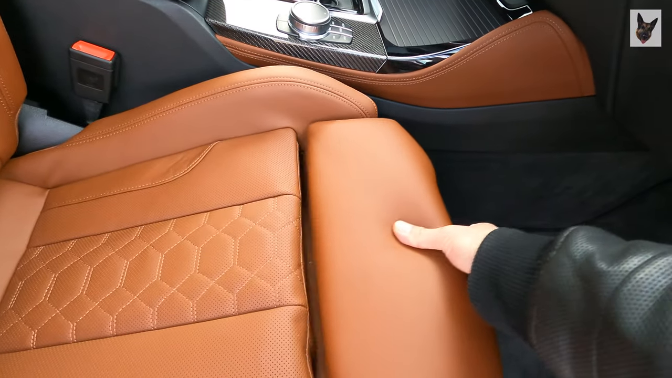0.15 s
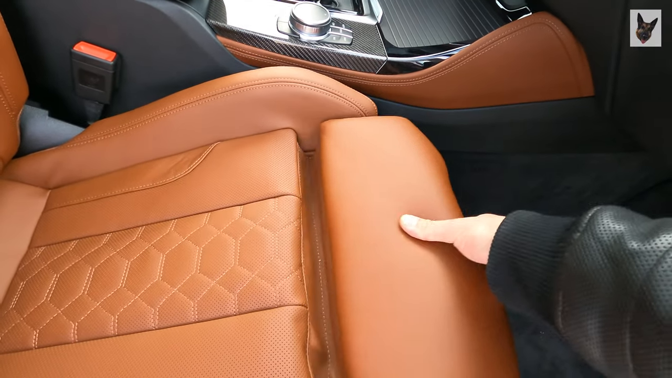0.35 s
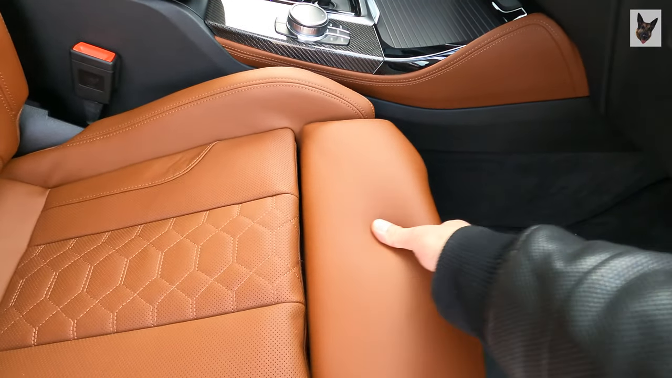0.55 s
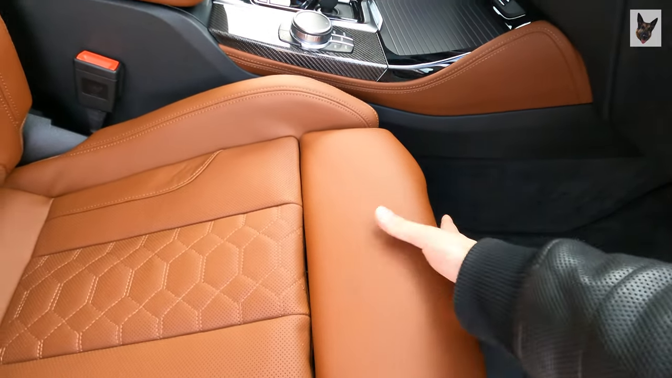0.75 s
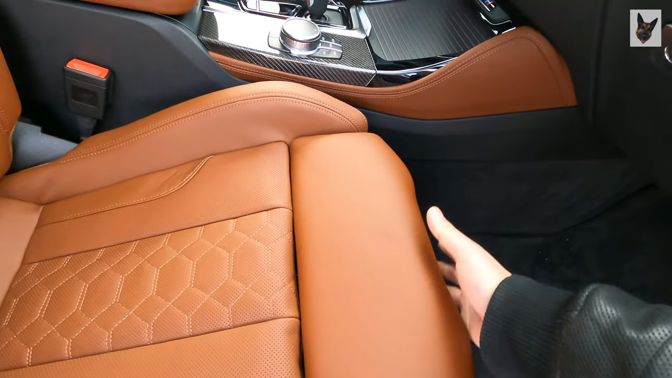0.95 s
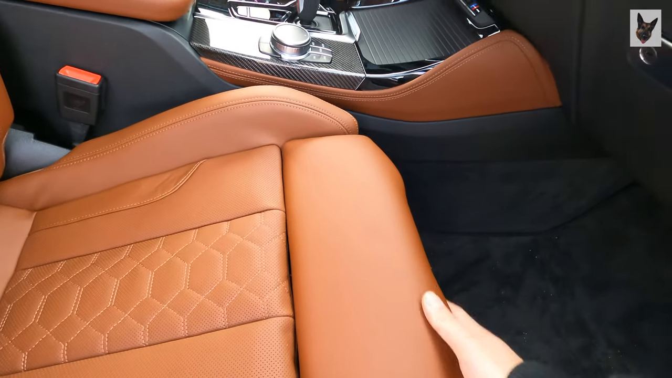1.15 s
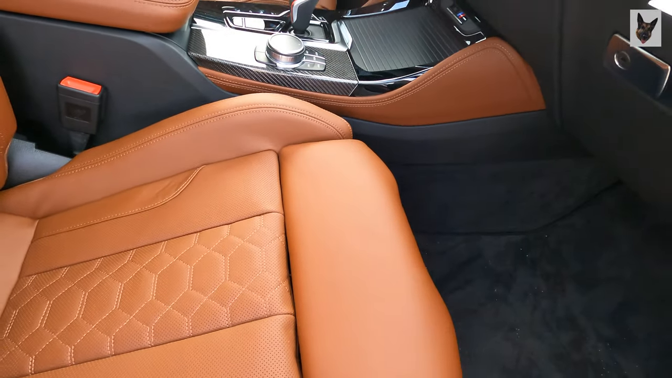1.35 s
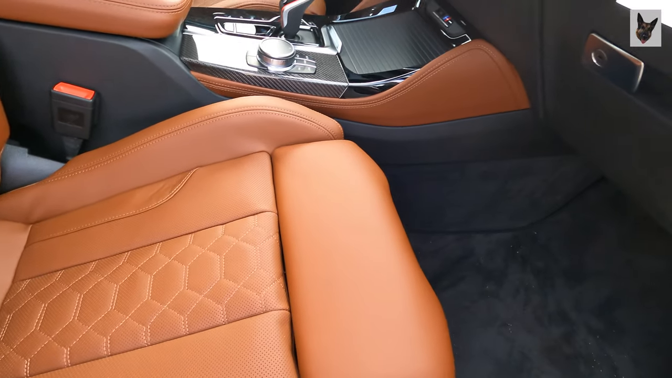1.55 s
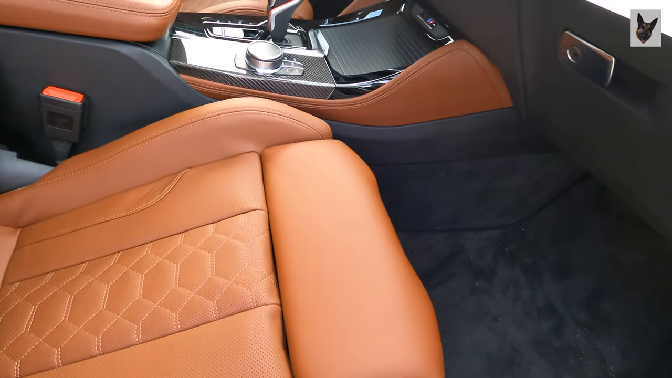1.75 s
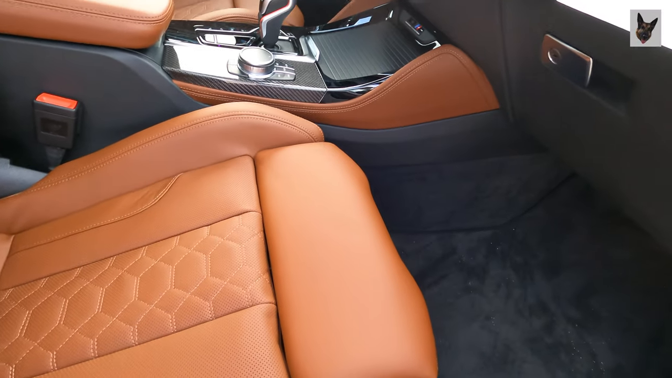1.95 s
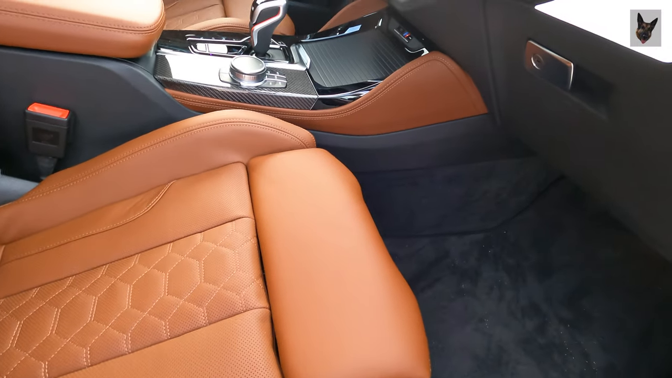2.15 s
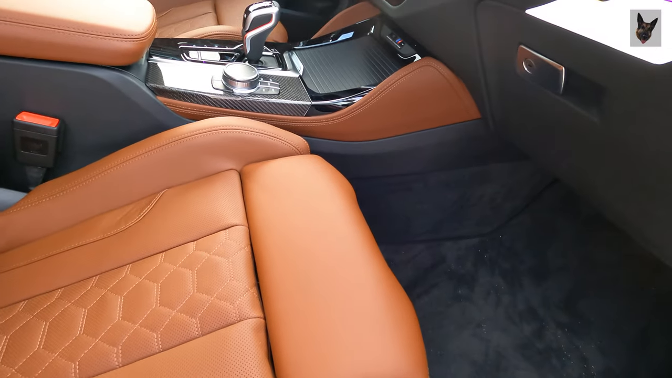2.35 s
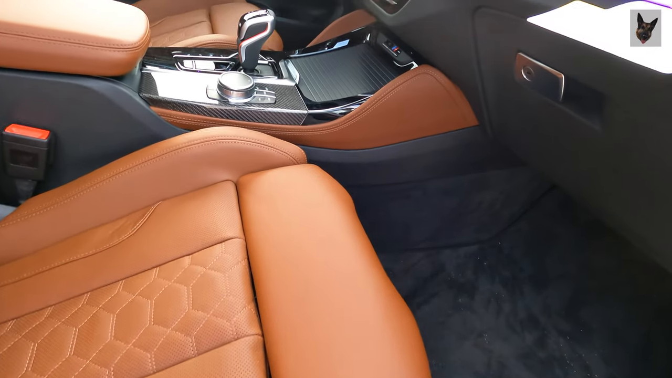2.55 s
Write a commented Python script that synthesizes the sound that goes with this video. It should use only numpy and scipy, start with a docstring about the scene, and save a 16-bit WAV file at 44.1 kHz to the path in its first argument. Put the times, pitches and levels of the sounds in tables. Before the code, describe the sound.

Sliding seat cushion knocks and thumps on its rails, then faint sleeve rustle in a quiet car

```python
"""In a car, close to a leather seat: a hand works the sliding thigh cushion out and back on its rails.
Friction grains make its strokes, struck modes and noise bursts the knocks of latch and stops, and low
decaying sines the thump and sway of the frame. Afterwards a sleeve rustles in more even grains and a few
small ticks ring. Noise in shaped bands rumbles as traffic outside. Stereo is built as mid and side."""
import sys
import numpy as np
from scipy import signal
from scipy.io import wavfile

SR = 44100
rng = np.random.default_rng(int(sys.argv[2]) if len(sys.argv) > 2 else 0)


def dump_mix(stems):
    """Bounce the given channels to the path in sys.argv[1] as a 16-bit WAV at rate SR."""
    frames = np.atleast_2d(stems).T  # one column per channel
    limited = np.clip(frames, -1, 1)  # hard clip at full scale
    pcm = np.round(limited * 32767).astype(np.int16)
    wavfile.write(sys.argv[1], SR, pcm)


N = 114660
NEAR_SIDE_DB = -13   # added to the side level close to the microphone: seat and sleeve friction is narrower

# Knocks of latch and stops: (time [s], first touch [dB] before the mode's own level, pitch struck most [Hz],
# spread [octaves], rattle length [s], crack [dB])
KNOCKS = [(0.198, -40, 800, .4, 0.0022, -65), (.2188, -34, 1000, 1.1, .0015, -43),
          (0.221, -32, 593, 0.82, 0.0073, -51), (0.236, -36, 600, 0.6, 0.0061, -66),
          (0.399, -41, 1200, 1.3, 0.0021, -53.5), (.4050, -33, 2500, .45, .005, -46),
          (.4095, -36, 950, .5, .003, -54), (.6208, -23.5, 1100, .7, .005, -42),
          (0.622, -27.5, 630, 0.34, 0.0052, -49.5), (.6735, -31, 700, .9, .004, -46),
          (0.778, -45.5, 1760, 2, 0.0029, -47.5), (.8168, -30, 3200, .9, .006, -37),
          (0.817, -22, 693, 0.3, 0.00404, -42.5), (0.826, -35.5, 525, 0.12, 0.01443, -70)]
# Ringing modes of the seat: (frequency [Hz], level [dB], decay by 60 dB [s])
SEAT_MODES = [(270.4, 11.5, 0.1), (360, -1, 0.095), (510, 6.5, 0.024), (685, -4, 0.051), (976, 0, 0.014),
              (1144, 1.5, 0.02), (1476, -3.5, 0.021), (2130, -6, 0.014), (2505, -2.5, 0.025),
              (3330, -5, 0.013), (3820, -8, 0.018), (5060, -9.5, 0.021)]
TOUCHES, TOUCH_LOSS_DB = 6, 2   # touches in one rattle, each weaker than the last
CONTACT_HZ = 5000   # softness of a touch
CRACK_T60_S = 0.07


def knocks():
    """Each knock rattles in quick touches on the modes around its pitch; returns ringing and crack envelope."""
    start, first_db, centre_hz, spread, length, crack_db = np.transpose(KNOCKS)[:, :, None]
    touch = np.arange(TOUCHES)
    lateness = rng.uniform(0, .7, (len(start), TOUCHES)) * (touch > 0)
    times = start + (touch + lateness) / TOUCHES * length
    at = (times * SR).astype(int)
    signs = rng.choice([-1, 1], at.shape)
    loss_db = TOUCH_LOSS_DB * touch

    ringing = np.zeros(N)
    for hz, mode_db, t60 in SEAT_MODES:
        near_db = -6 * (np.log2(hz / centre_hz) / spread) ** 2
        uneven_db = rng.normal(0, 1.1, at.shape)
        clicks = np.zeros(N)
        np.add.at(clicks, at, signs * amp(first_db + mode_db + near_db - loss_db + uneven_db))
        ringing += ring(band(clicks, hz / 2, min(2 * hz, CONTACT_HZ + hz)), hz, t60)

    bursts = np.zeros(N)
    np.add.at(bursts, at, amp(crack_db - loss_db))
    return ringing, dying(bursts, CRACK_T60_S)


# Spectrum of the cracks and snaps: (frequency [Hz], relative density [dB per Hz])
CRACK_SPECTRUM = [(500, 10.5), (1000, 0.5), (2000, -4.5), (3500, -6.5), (6000, -21.5), (9000, -66)]


def crack_noise(envelope):
    """Hard contacts give bursts of noise with a rounded-off treble."""
    noise = colour(rng.standard_normal((2, 2, N)), CRACK_SPECTRUM, patchy_db=1, side_db=NEAR_SIDE_DB)
    return soften(envelope * noise, 14000)


# Thuds and slower rocking of the seat frame: (time [s], level before rise and decay [dB],
# frequency [Hz], negative starts downwards, decay by 60 dB [s], rise time constant [s])
SWAYS = [(0.224, -20.5, 91.5, 0.16, 0.0013), (0.231, -22.5, -165, 0.14, 0.0011),
         (0.243, -22.5, 61.5, 0.38, 0.0044), (0.266, -21.5, 158.5, 0.085, 0.0024),
         (0.389, -18.5, 45.5, 0.17, 0.0076), (0.41, -15, -155, 0.057, 0.0011), (.54, -25.5, 91, 0.66, .03),
         (0.672, -13.5, 158.5, 0.05, 0.00063), (0.684, -19.5, 46, 0.59, 0.0054),
         (0.685, -20.5, 93, 0.22, 0.00077), (0.809, -19, -120, 0.075, .002),
         (0.8202, -5, -190, 0.039, 0.0023), (0.8228, -15, 253, 0.057, 0.0008),
         (0.822, -19.5, 104, 0.086, 0.002), (0.84, -11.5, 185, 0.024, 0.0011),
         (0.847, -24, 32, 0.33, 0.007)]
WAVER_DB = 2.5   # the frame's ringing is uneven


def sways():
    """A soft push sets the frame ringing low: a sine that rises gently, wavers and decays."""
    out = np.zeros(N)
    for start, db, hz, t60, rise in SWAYS:
        t = np.maximum(np.arange(N) / SR - start, 0)
        # the waver comes in over the first 26 ms
        waver_db = WAVER_DB * np.minimum(t / 0.026, 1) * drift(14.6)
        level = amp(db - 60 * t / t60 + waver_db)
        out += level * (1 - np.exp(-t / rise)) * np.sin(2 * np.pi * hz * t)
    return out


# Strokes of the cushion on its rails: (start [s], rise [s], hold [s], fall [s],
# first level [dB], last level [dB], treble hiss relative to these levels [dB])
SLIDE = [(.17, 0.061, .12, 0.041, -39, -53, -37), (.383, 0.014, 0.022, 0.08, -46.5, -52, -41),
         (.44, 0.015, 0.031, 0.032, -59, -61, -24), (.572, 0.028, 0.064, 0.035, -41, -48.5, -34.5),
         (.64, 0.019, 0.015, 0.05, -45, -42, -23.5), (.70, 0.012, 0.18, 0.023, -60.5, -60.5, -34),
         (.772, 0.019, 0.017, 0.045, -45, -38, -45)]
# Spectrum of the rails' friction: (frequency [Hz], relative density [dB per Hz])
RAILS = [(300, 10), (600, 17.5), (1100, 5.5), (2000, 8.5), (4000, -3), (7000, -6.5), (11000, -53)]


def cushion_slide():
    """The cushion rubs along its rails in grains of very uneven size."""
    return rubbing(SLIDE, RAILS, spread_db=2.5)


# Brushes of the sleeve: (start [s], rise [s], hold [s], fall [s],
# first level [dB], last level [dB], treble hiss relative to these levels [dB])
RUSTLE = [(1.11, 0.041, 0.2, .05, -66, -58.5, -13.5), (1.36, 0.024, 0.38, 1, -71, -69, -34),
          (2.1, 0.041, 0.026, 0.077, -64, -68, -26), (2.25, .05, 0.032, 0.046, -64, -62, -46)]
# Spectrum of the cloth's friction: (frequency [Hz], relative density [dB per Hz])
CLOTH = [(700, -23), (1800, 0.5), (3500, -6), (5500, -10), (8000, -22), (11000, -63)]
CLOTH_SPREAD_DB = 1   # unevenness of the cloth's grains


def sleeve_rustle():
    """The sleeve brushes in grains of more even size than the rails'."""
    return rubbing(RUSTLE, CLOTH, CLOTH_SPREAD_DB)


# The cloth whisks in a narrow band: (loudest [s], length [s], level [dB], frequency [Hz], bandwidth [Hz])
WHISKS = [(1.345, 0.076, -62.5, 3370, 1800), (2.143, .045, -72, 7540, 597)]


def whisks():
    """Cloth friction swells briefly in one band, in the middle of the stereo image."""
    t, slips = np.arange(N) / SR, grains(CLOTH_SPREAD_DB)[0, 0]
    out = np.zeros(N)
    for loudest, length, db, hz, width_hz in WHISKS:
        swell = np.exp(-(2 * (t - loudest) / length) ** 2)
        out += amp(db) * swell * rms_one(band(slips, hz - width_hz / 2, hz + width_hz / 2))
    return out


# Small ticks: (time [s], level before softening [dB], frequency [Hz], decay by 60 dB [s])
TICKS = [(1.762, -43.5, 3140, 0.0027), (1.957, -39.5, 1860, 0.023), (2.2084, -44, 2400, 0.0074),
         (2.3179, -35.5, 1110, 0.01), (2.3253, -37.5, 2350, 0.012)]
SNAP_DB, SNAP_T60_S = -5.5, 0.029   # noise snap relative to its tick, before softening


def ticks():
    """Each click rings briefly at its own pitch; returns softened ringing and the envelope of its snap."""
    ringing, bursts = np.zeros(N), np.zeros(N)
    for start, db, hz, t60 in TICKS:
        click = np.zeros(N)
        click[int(start * SR)] = amp(db)
        ringing += ring(click, hz, t60)
        bursts += click
    snap = amp(SNAP_DB) * soften(dying(bursts, SNAP_T60_S), 1500)
    return soften(soften(ringing, 5200), 5200), snap


# Spectrum of the traffic outside: (frequency [Hz], relative density [dB per Hz])
TRAFFIC = [(20, -0.5), (100, 1.5), (150, -11), (250, -13), (360, -16), (520, -28), (650, -23),
           (1000, -23.5), (1500, -33), (2200, -64.5), (4000, -58.5), (8000, -59.5), (10500, -93)]
TRAFFIC_DB = -37.5   # before its treble is softened


def traffic():
    """Traffic outside rumbles as slightly flickering noise, central in the bass and wider towards the treble."""
    rumble = colour(rng.standard_normal((2, 2, N)), TRAFFIC, patchy_db=1, side_db=1.5)
    return soften(amp(TRAFFIC_DB) * rumble, 8500)


GRAINS_PER_S = 5000


def grains(spread_db):
    """Friction as dense slips of uneven size and random sign: (2 draws, mid and side, time)."""
    uneven_db = spread_db * np.minimum(rng.exponential(1, (2, 2, N)), 5)
    sizes = amp(uneven_db) * rng.standard_normal((2, 2, N))
    return sizes * (rng.random((2, 2, N)) < GRAINS_PER_S / SR)


FADE_DB = 25   # level change over a rise, and over each of two falls
TOP_PAN_DB = -4   # left channel of the hiss; the right gets the opposite


def rubbing(strokes, spectrum, spread_db):
    """Friction grains swell under each stroke, with a thin hiss on top that leans to the right."""
    body, thin, t = np.zeros(N), np.zeros(N), np.arange(N) / SR
    for start, rise, hold, fall, first_db, last_db, top_db in strokes:
        times = start + np.cumsum([0, rise, hold, fall, fall])
        levels_db = [first_db - FADE_DB, first_db, last_db, last_db - FADE_DB, last_db - 2 * FADE_DB]
        # after the second fall the faint last level stays
        level = amp(np.interp(t, times, levels_db)) * (t >= start)
        body += level
        thin += level * amp(top_db)
    hiss = rms_one(band(rng.standard_normal((2, N)), 11000, 15500))
    hiss = hiss * amp([[TOP_PAN_DB], [-TOP_PAN_DB]])
    friction = colour(grains(spread_db), spectrum, patchy_db=1, side_db=NEAR_SIDE_DB)
    return body * friction + thin * hiss


# Stereo width shared by the coloured noises: (frequency [Hz], side relative to mid [dB] before side_db)
SIDE_DB = [(30, -64), (200, -35), (550, -22), (1300, -13.5), (3000, -2), (10000, -8.5)]


def colour(source, spectrum, patchy_db, side_db):
    """Half-octave bands of a (2 draws, mid and side) source, each with its level, flicker and width; rms 1."""
    out, edges = 0, 18 * 2 ** np.arange(0, 10, .5)
    for k, (low, high) in enumerate(zip(edges, edges[1:])):
        hz = np.sqrt(low * high)
        if spectrum[0][0] * .8 < hz < spectrum[-1][0] * 1.2:
            mid, side = band(source[k % 2], low, high)   # neighbouring bands use different draws
            gain = amp(at_hz(spectrum, hz) + patchy_db * drift(20.5))
            width = amp(at_hz(SIDE_DB, hz) + side_db)
            out = out + gain * (mid + width * side * [[1], [-1]])
    return rms_one(out)


def drift(rate_hz):
    """Slow chance of spread 1: noise smoothed twice at a rate, in steps of 40 samples."""
    r = np.exp(-80 * np.pi * rate_hz / SR)
    steps = rng.standard_normal(N // 40 + 2002)
    slow = signal.lfilter([1], [1, -2 * r, r * r], steps)[2000:]   # skip the run-in
    return np.interp(np.arange(N) / 40, np.arange(len(slow)), rms_one(slow))


def ring(clicks, hz, t60):
    """A resonance: a unit click sets a decaying sine of height about 1 ringing."""
    r, w = amp(-60 / (t60 * SR)), 2 * np.pi * hz / SR
    return signal.lfilter([0, np.sin(w)], [1, -2 * r * np.cos(w), r * r], clicks + 1e-18)


def dying(bursts, t60):
    """Each burst jumps up and dies away exponentially."""
    return signal.lfilter([1], [1, -amp(-60 / (t60 * SR))], bursts + 1e-18)


def band(x, low_hz, high_hz):
    """Pass one band."""
    return signal.sosfilt(signal.butter(2, [low_hz, high_hz], "band", fs=SR, output="sos"), x)


def soften(x, hz):
    """Roll off everything above a frequency."""
    return signal.sosfilt(signal.butter(2, hz, fs=SR, output="sos"), x)


def at_hz(points, hz):
    """Read a (frequency, level) table along a logarithmic frequency axis."""
    table_hz, table_db = np.transpose(points)
    return np.interp(np.log(hz), np.log(table_hz), table_db)


def amp(db):
    """Decibels to amplitude."""
    return 10 ** (np.asarray(db, float) / 20)


def rms_one(x):
    """Scale to an rms of 1."""
    return x / np.sqrt(np.mean(x ** 2) + 1e-20)


def scene():
    """The seat up close, then sleeve and ticks, over the traffic rumble outside."""
    knock_ringing, crack = knocks()
    tick_ringing, snap = ticks()
    blows = knock_ringing + sways() + tick_ringing   # in the middle of the stereo image
    cloth = sleeve_rustle() + whisks()
    return blows + crack_noise(crack + snap) + cushion_slide() + cloth + traffic()


def record(dry):
    """The microphone's end of the chain: a steep filter cuts the top above 15.7 kHz."""
    return signal.sosfilt(signal.cheby2(12, 70, 15700, fs=SR, output="sos"), dry)


dry = scene()
out = record(dry)
dump_mix(out)
```